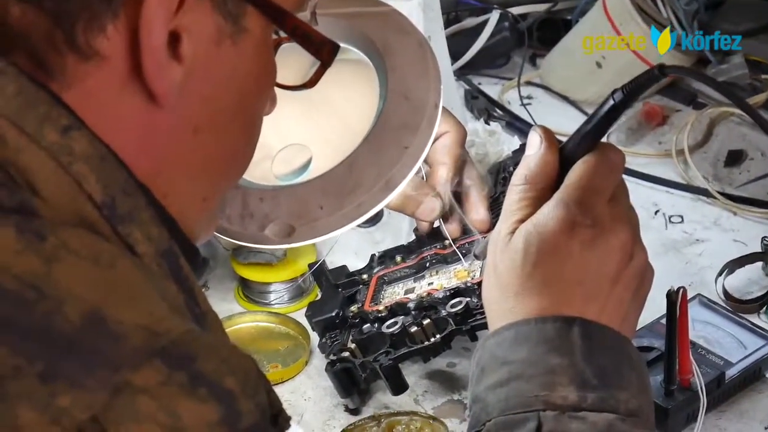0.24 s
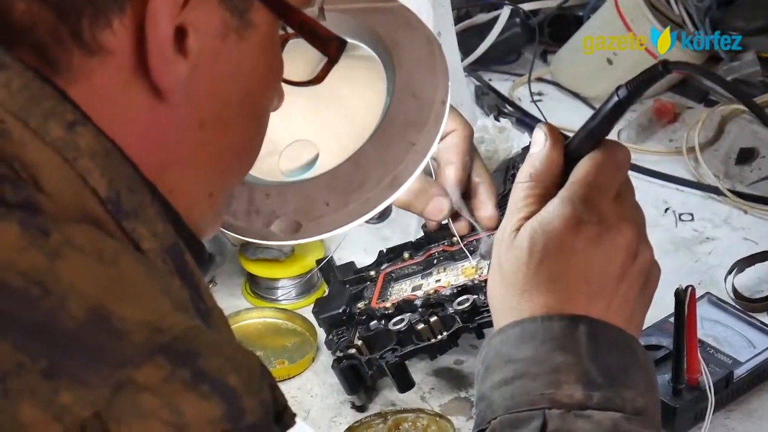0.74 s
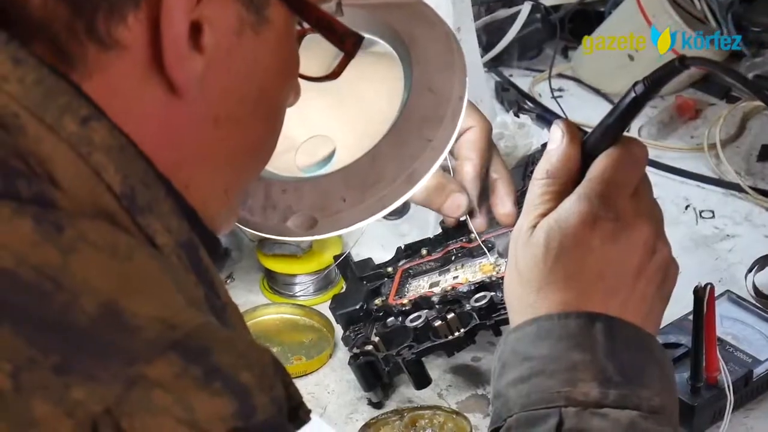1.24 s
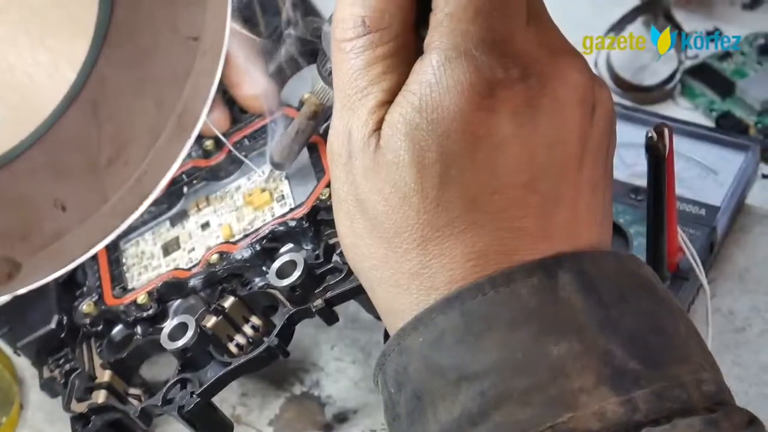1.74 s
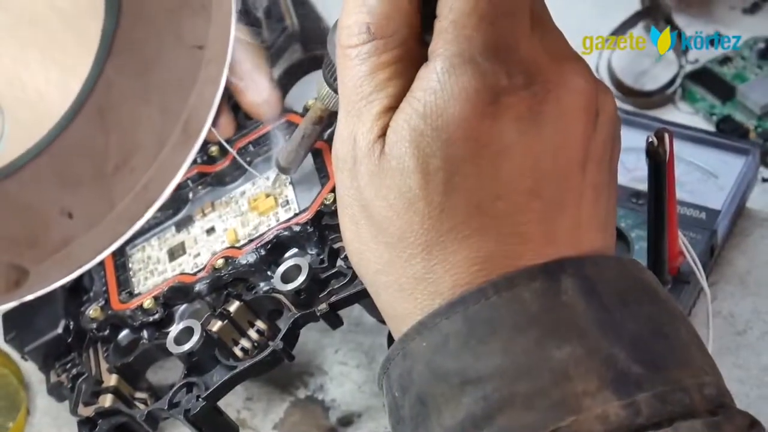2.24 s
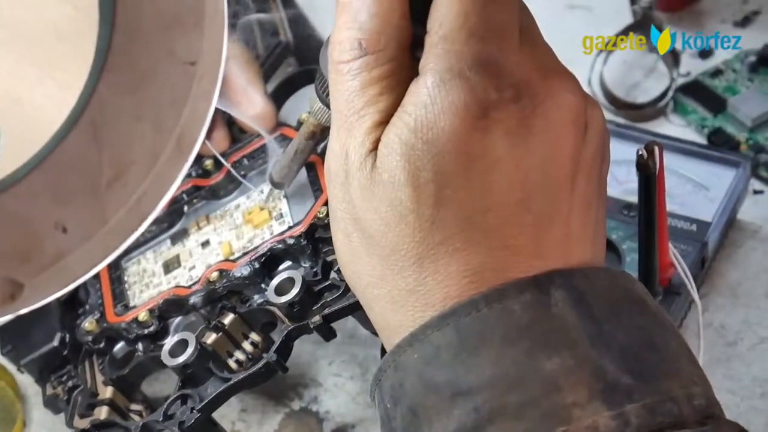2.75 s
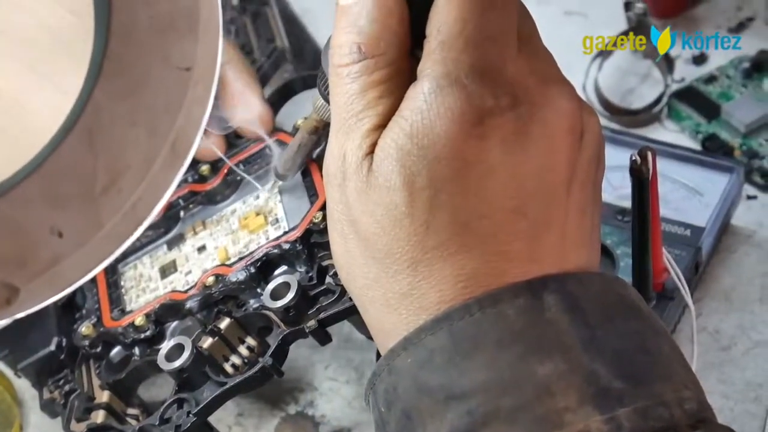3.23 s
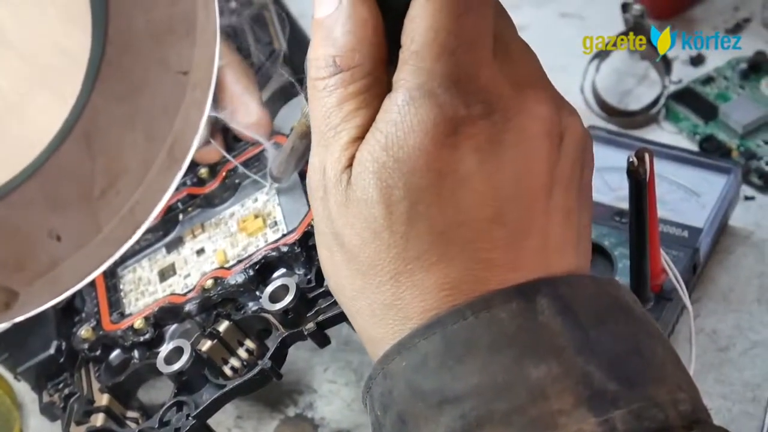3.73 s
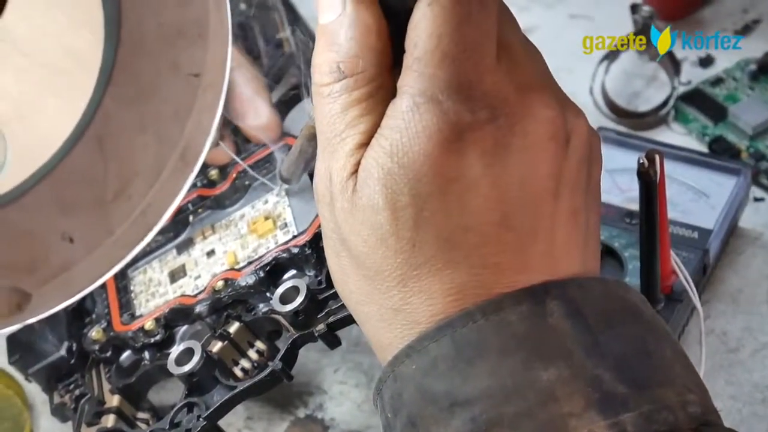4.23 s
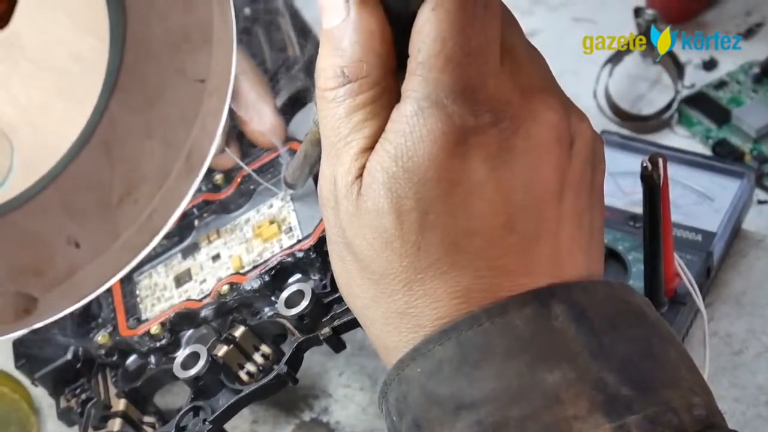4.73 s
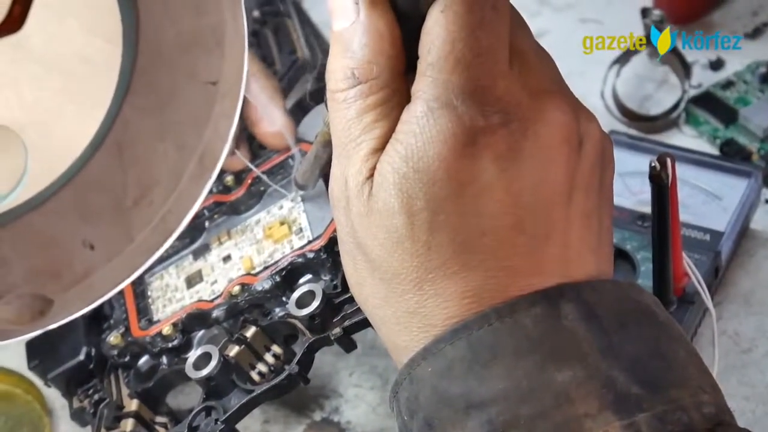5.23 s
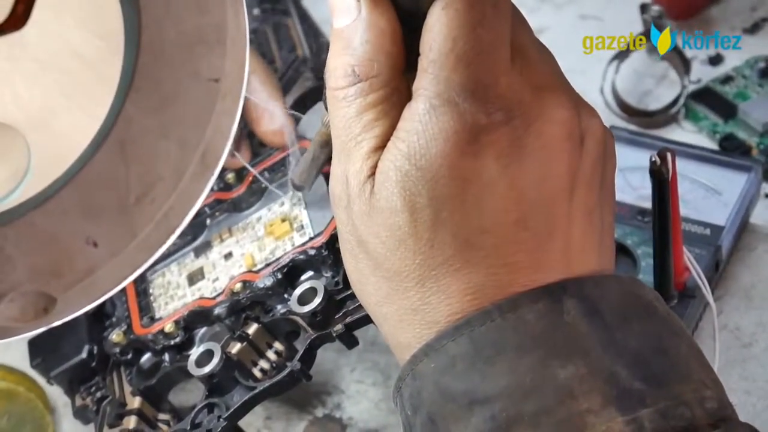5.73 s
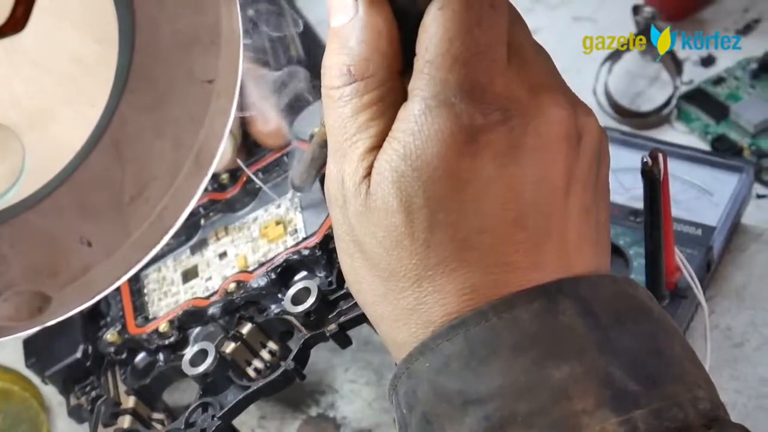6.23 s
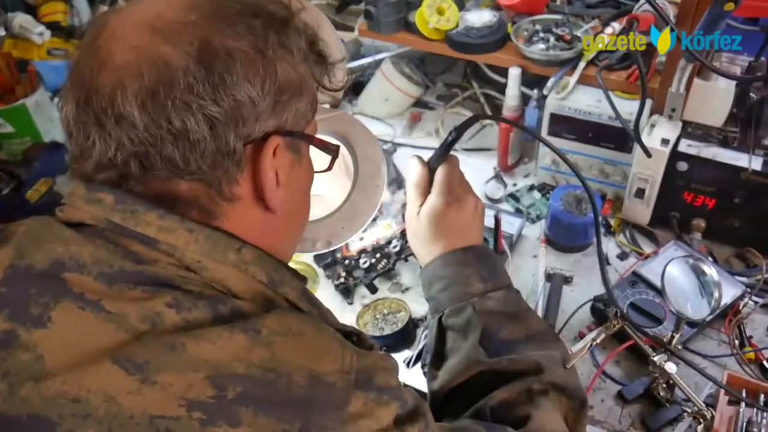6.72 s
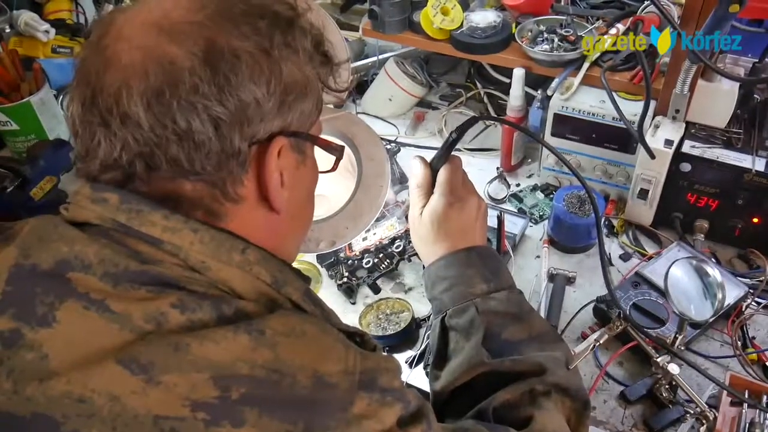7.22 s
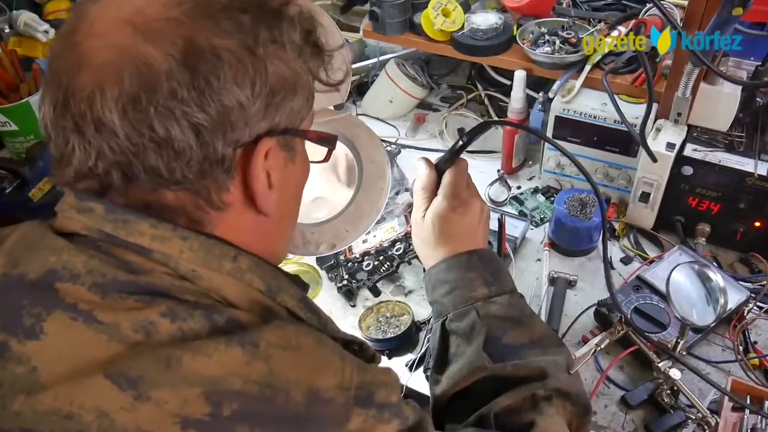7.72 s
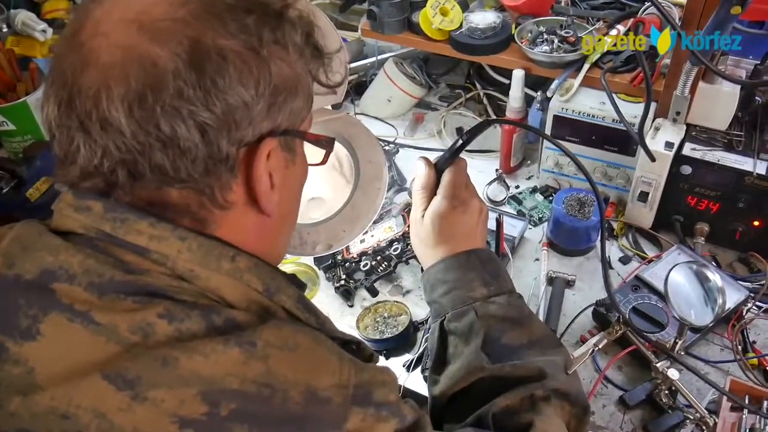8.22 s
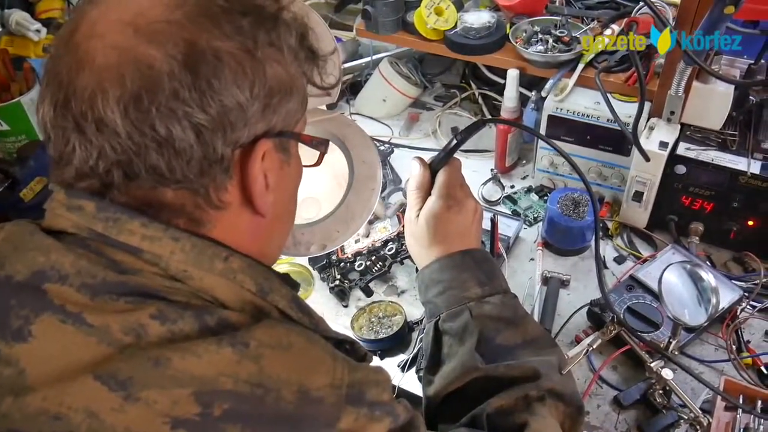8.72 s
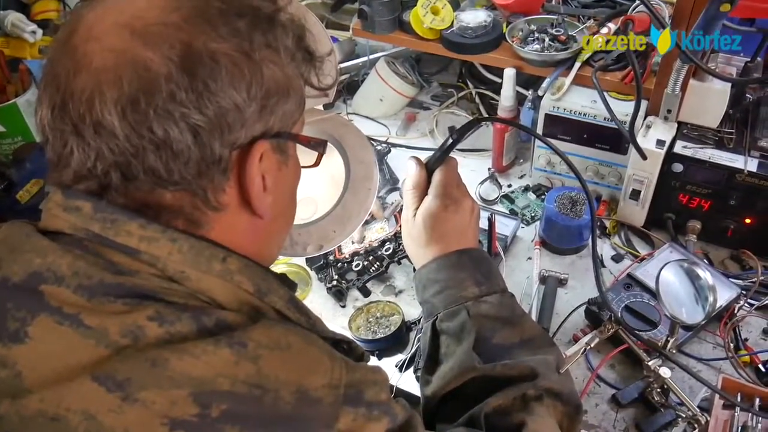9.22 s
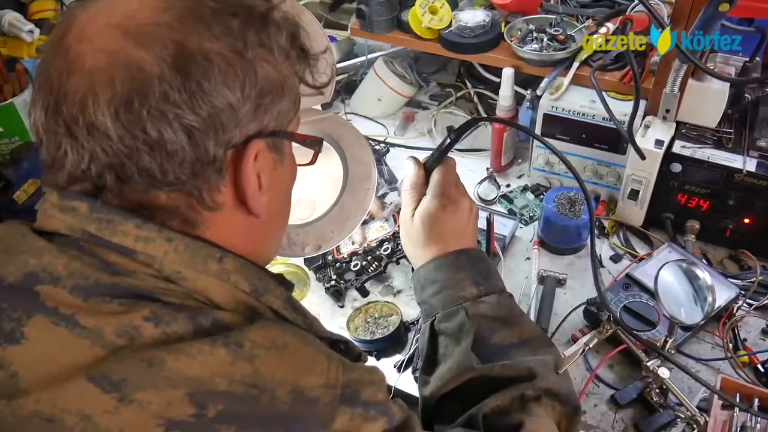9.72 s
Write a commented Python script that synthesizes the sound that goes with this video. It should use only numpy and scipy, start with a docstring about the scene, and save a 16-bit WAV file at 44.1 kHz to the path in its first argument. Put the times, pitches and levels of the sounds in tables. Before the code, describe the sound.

A low pump hum drones on a repair bench with small tool clicks and sizzling flux, cut twice by silence, ending in a broad airy rush.

```python
"""Repair bench, heard from three places in turn with a short silence between them.
A small air pump hums as stroke harmonics over coloured room noise; a far engine climbs as two sine orders.
At the last place a broad rush of turbulent noise, with whistles and a thrum, swells over the hum.
Tools tap as noise contacts ringing damped modes; flux spits under the iron as decaying noise puffs."""
import sys
import numpy as np
from scipy import signal
from scipy.fft import rfft, irfft, next_fast_len
from scipy.io import wavfile

SR = 44100
rng = np.random.default_rng(int(sys.argv[2]) if len(sys.argv) > 2 else 0)


def master_out(mix):
    """Clip the mix to full scale and print it as 16-bit PCM to the path in sys.argv[1]."""
    frames = np.transpose(np.atleast_2d(mix))
    ceiling = np.clip(frames, -1, 1)
    pcm = np.round(ceiling * 32767).astype(np.int16)
    wavfile.write(sys.argv[1], SR, pcm)


def decibels_to_gain(level_db):
    """Convert a level in decibels to a linear amplitude gain (20 dB per decade)."""
    exponent = np.asarray(level_db, float) / 20
    return 10 ** exponent


N = 439236


def rms_one(x):
    """Scales a signal to unit rms."""
    return x / np.sqrt(np.mean(x ** 2) + 1e-20)


def in_time(rows, outside=None):
    """Interpolates each column over time; first column is time_s."""
    time_s, *columns = np.transpose(rows)
    t = np.arange(N) / SR
    return [np.interp(t, time_s, column, outside, outside) for column in columns]


def at_hz(points, hz, column=1):
    """Interpolates a column over log frequency."""
    points = np.array(points)
    return np.interp(np.log(hz + 1), np.log(points[:, 0]), points[:, column])


def drift(rate_hz):
    """Slow Gaussian wander of spread 1: noise through a double pole at a 40 times lower rate."""
    step = 40
    r = np.exp(-2 * np.pi * step * rate_hz / SR)
    noise = rng.standard_normal(N // step + 2002)
    slow = signal.lfilter([1], [1, -2 * r, r * r], noise)[2000:]
    return np.interp(np.arange(N) / step, np.arange(len(slow)), rms_one(slow))


def coloured(x, spectrum):
    """Multiplies the signal's spectrum by a table of hz, gain_db."""
    size = next_fast_len(N)
    gain = decibels_to_gain(at_hz(spectrum, np.fft.rfftfreq(size, 1 / SR)))
    return irfft(rfft(x, size) * gain, size)[..., :N]


def resonance(x, hz, width_hz):
    """Two-pole resonator."""
    r = np.exp(-np.pi * width_hz / SR)
    feedback = [1, -2 * r * np.cos(2 * np.pi * hz / SR), r * r]
    return signal.lfilter([(1 - r * r) / 2, 0, (r * r - 1) / 2], feedback, x)


def narrow_noise(hz, width_hz, shape=N):
    """Noise of unit rms through two equal resonators."""
    once = resonance(rng.standard_normal(shape), hz, width_hz)
    return rms_one(resonance(once, hz, width_hz))


def spell_gain(start_s, length_s, level_db, rise_db_per_s, fall_db_per_s):
    """Gain that rises, holds its level and dies away, linear in dB."""
    t = np.arange(N) / SR
    rise_db = rise_db_per_s * (start_s - t)
    fall_db = fall_db_per_s * (t - start_s - length_s)
    return decibels_to_gain(level_db - np.maximum(0, np.maximum(rise_db, fall_db)))


# listening places: start_s, end_s, fade_out_s, pump_smear_rad
PLACES = [(0, 1.542, .014, -.18), (1.821, 6.544, .012, .08), (6.805, 9.97, .001, -.08)]


def place_index():
    """Number of the current place; switches inside the silences."""
    switches_s = [end + .05 for start, end, fade, smear in PLACES]
    return np.searchsorted(switches_s, np.arange(N) / SR).clip(max=len(PLACES) - 1)


def place_gate():
    """Gain 1 while a place is open, 0 in the silences."""
    t = np.arange(N) / SR
    gate = np.zeros(N)
    for start, end, fade, smear in PLACES:
        opening = np.clip((t - start) / 0.00026, 0, 1) ** 2
        gate += opening * np.clip((end - t) / fade, 0, 1)
    return gate


# left-right correlation: hz, room, rush
LIKENESS = [(60, 0.58, 0.23), (150, 0.68, 0.85), (380, 0.2, 0.89), (950, 0.076, 0.3), (2400, 0.25, 0.52),
            (6000, 0.72, 0.9), (15000, .6, 0.58)]


def air(spectrum, levels_db, likeness_column, patchy_db):
    """Stereo noise in octave patches that flicker; the parts below and above 1.5 kHz each follow a level."""
    size = next_fast_len(N)
    hz = np.fft.rfftfreq(size, 1 / SR)
    alike = np.clip(at_hz(LIKENESS, hz, column=likeness_column), 0, 1)
    mid, side = rfft(rng.standard_normal((2, size)))
    stereo = np.sqrt(1 + alike) * mid + np.sqrt(1 - alike) * side * [[1], [-1]]
    stereo = decibels_to_gain(at_hz(spectrum, hz)) * stereo
    octave = np.clip(np.log2(hz / 1500 + 1e-9), -5.5, 3.5)
    together = drift(3.0)
    parts = [0, 0]
    for k in range(-6, 4):
        share = np.cos(np.pi / 2 * np.clip(octave - k - .5, -1, 1)) ** 2
        flicker = decibels_to_gain(patchy_db * (0.58 * together + drift(20.0)))
        parts[k >= 0] = parts[k >= 0] + irfft(stereo * share, size)[:, :N] * flicker
    return sum(decibels_to_gain(level) * rms_one(part) for level, part in zip(levels_db, parts))


# room noise colour: hz, relative_db_per_hz
ROOM_COLOUR = [(15, -54.5), (25, -20.5), (130, -8), (180, -6), (229, -8), (591, -11.5), (818, -9.5),
               (936, -18.5), (1070, -16.5), (1520, -21.5), (2840, -20.5), (3920, -31), (9840, -36),
               (14400, -39), (16000, -37)]
# room noise level, one row per place: below_1500hz_db, above_1500hz_db
ROOM_LEVEL = [(-49.5, -63), (-50, -63), (-53, -65)]


def room():
    """Coloured noise floor, plus a narrow band of hiss."""
    levels_db = np.array(ROOM_LEVEL)[place_index()].T
    floor = air(ROOM_COLOUR, levels_db, likeness_column=1, patchy_db=-0.5)
    hiss = narrow_noise(2863, 250, (2, N))
    hiss_db = levels_db[1] - 12 + 1.9 * drift(5.7)
    return floor + decibels_to_gain(hiss_db) * hiss


# far engine: time_s, first_order_hz, first_order_db, second_order_db
ENGINE = [(1.82, 53.9, -69.5, -63.5), (2.2, 60, -61.5, -61.5), (2.6, 65.5, -70, -52),
          (2.75, 65.3, -57, -65.5), (2.95, 68.6, -53.5, -57), (3.5, 74.8, -52, -79),
          (3.72, 73.2, -57.5, -73.5), (3.85, 73.3, -73, -74)]


def engine():
    """Two low orders, phase-locked, following the speed."""
    hz = in_time(ENGINE)[0]
    first_db, second_db = in_time(ENGINE, outside=-140)[1:]
    turn = 2 * np.pi * np.cumsum(hz) / SR
    return np.sqrt(2) * (decibels_to_gain(first_db) * np.sin(turn) + decibels_to_gain(second_db) * np.sin(2 * turn))


def causal_phase(levels_db):
    """Minimum phase: the most compact pulse with these harmonic levels, by folding the cepstrum."""
    padded_db = np.r_[levels_db[0], levels_db, [levels_db[-1] - 10] * 4]
    shape = np.log(decibels_to_gain(padded_db))
    folded = irfft(shape)
    folded[1:len(shape) - 1] *= 2
    folded[len(shape):] = 0
    return rfft(folded).imag[1:len(levels_db) + 1]


# pump harmonics shaped by the room: multiple, then left_db, right_db for each place
PUMP = [(1, -77, -79, -69, -71, -80, -82), (2, -64, -61, -64, -61, -61, -60),
        (3, -82, -82, -71, -68, -82, -82), (4, -53, -53, -52, -52, -54, -54),
        (5, -65, -61, -58, -60, -82, -82), (6, -64, -65, -56, -57, -53, -54),
        (7, -63, -64, -60, -59, -58, -59), (8, -56, -55, -58, -59, -53, -56),
        (9, -68, -60, -59, -58, -82, -62), (10, -61, -58, -61, -62, -82, -60),
        (11, -59, -55, -67, -59, -65, -60), (12, -50, -55, -78, -58, -53, -60),
        (13, -63, -62, -56, -62, -53, -57), (14, -68, -65, -59, -60, -54, -52),
        (15, -67, -67, -71, -66, -57, -56), (16, -56, -68, -56, -58, -55, -61),
        (17, -63, -58, -52, -55, -56, -54), (18, -52, -70, -50, -53, -48, -58),
        (19, -58, -62, -82, -82, -69, -68), (20, -73, -71, -79, -82, -82, -68),
        (21, -76, -74, -71, -82, -82, -67), (22, -73, -74, -70, -77, -82, -68),
        (23, -62, -75, -59, -59, -61, -68), (24, -61, -71, -59, -73, -64, -82),
        (25, -60, -64, -63, -77, -81, -70), (26, -65, -68, -69, -82, -64, -82),
        (27, -66, -70, -65, -65, -62, -68), (28, -75, -64, -69, -65, -62, -65),
        (29, -69, -72, -77, -79, -78, -80), (30, -75, -78, -82, -82, -82, -82),
        (31, -69, -72, -82, -82, -82, -82)]


def pump():
    """Stroke harmonics; push and pull differ, the room smears the pulse, the right side hears it late."""
    stroke_hz = 45.83 * (1 + 1e-4 * drift(0.24))
    stroke = np.exp(2j * np.pi * np.cumsum(stroke_hz) / SR)
    table = np.array(PUMP)
    k = table[:, 0]
    right = np.array([[0], [1]])
    weights = []
    for n, (start, end, fade, smear_rad) in enumerate(PLACES):
        level_db = table[:, 1 + 2 * n:3 + 2 * n].T
        phase = np.array([causal_phase(db) for db in level_db])
        phase = phase + smear_rad * k * k
        phase = phase + 2.4 * (k % 2)     # odd harmonics: push against pull
        phase = phase - .03 * right * k   # delay on the right
        weights.append(np.sqrt(2) * decibels_to_gain(level_db) * np.exp(1j * phase))
    place = place_index()
    out = np.zeros((2, N))
    harmonic = np.ones(N)
    for weight in np.transpose(weights):
        harmonic = harmonic * stroke
        waver = 1 + 0.13 * drift(1.9)
        out += (weight[:, place] * harmonic).real * waver
    return out


# rush colour: hz, relative_db_per_hz
RUSH_COLOUR = [(35, -53), (60, -15.5), (79, -15.5), (193, 1), (389, -5), (437, 0), (492, -6), (698, -4),
               (1110, -12.5), (1250, -12), (3500, -15), (4030, -21.5), (6900, -23.5), (10500, -35.5),
               (16000, -63)]
# rush level: time_s, below_1500hz_db, above_1500hz_db
RUSH_LEVEL = [(6.81, -39, -43), (6.9, -40.5, -43.5), (7.15, -48.5, -55), (7.25, -44.5, -57),
              (7.36, -39, -47), (7.76, -39, -43), (9.96, -41.5, -44)]
# faint steady whistles: hz, resonator_width_hz, db_re_upper_rush
WHISTLES = [(2950, 37, -23), (3430, 54, -14.5)]
# swells of the lowest whistle: start_s, length_s, level_db
SWELLS = [(8.63, .25, -48), (9.78, .13, -51.5)]
# low thrum: time_s, level_db
THRUM = [(6.806, -49), (7.716, -49.5), (8.2, -56)]


def rush():
    """Broad turbulent air, with whistles and a thrum as resonated noise."""
    low_db, high_db = in_time(RUSH_LEVEL, outside=-140)
    out = air(RUSH_COLOUR, (low_db, high_db), likeness_column=2, patchy_db=0.65)
    for hz, width_hz, relative_db in WHISTLES:
        whistle_db = relative_db + high_db + 2.5 * drift(6.9)
        out = out + decibels_to_gain(whistle_db) * narrow_noise(hz, width_hz)
    swell = sum(spell_gain(*row, rise_db_per_s=104, fall_db_per_s=98) for row in SWELLS)
    out = out + swell * decibels_to_gain(2.0 * drift(8.0)) * narrow_noise(1904, 240)
    thrum_db = in_time(THRUM, outside=-140)[0]
    return out + decibels_to_gain(thrum_db) * narrow_noise(150, 64.0)


# tool taps: start_s, peak_db, contact_ms, softness_cut_hz, body_below_2khz_db
TAPS = [(0.459, -31.5, 21, 8000, 4), (.839, -52, 7.2, 4000, -2), (.96, -50, 38, 3500, 0),
        (1.02, -51.5, 25, 3540, -4), (1.251, -24, 2.5, 14230, -8), (1.291, -37.5, 24, 2830, 2.5),
        (1.43, -44, 36, 2790, 3), (1.47, -49, 25, 4000, -6.5), (1.524, -34, 11, 2920, 1),
        (3.664, -39.5, 4.4, 5000, 13), (5.115, -54, 10, 8000, -12), (5.2346, -32, .3, 3600, -6),
        (5.264, -32, 0.29, 3330, -6), (5.404, -41, .3, 4000, -0.5), (6.3821, -14, .3, 9000, -11.5)]
# ringing modes of a tap: hz, level_db, t60_s
TAP_MODES = [(1180, -11, 0.022), (1610, -6, 0.0087), (2250, -1, 0.0051), (2574, -0.5, .009),
             (3080, -5.5, 0.01), (3600, -3, 0.012), (4250, -4.5, 0.0097), (4680, -7, .007),
             (5400, -4.5, 0.0059), (6980, -7.5, 0.002), (9500, -2.5, 0.0015), (13000, -13.5, 0.0019)]


def taps():
    """A rough contact drives every damped mode; the walls answer with a short tail."""
    out = np.zeros(N)
    for start_s, peak_db, contact_ms, cut_hz, body_db in TAPS:
        length = int(np.clip(contact_ms * SR / 1000, 8, 1500))
        envelope = np.sin(np.pi * (np.arange(length) / length) ** 0.55)
        push = np.zeros(3000)
        push[:length] = .5 * rng.standard_normal(length) * envelope
        push[4] += 3.0   # first touch: a clean tick
        push = signal.lfilter(*signal.butter(4, cut_hz, fs=SR), push)   # softer is duller
        sound = 0
        for k, (hz, level_db, t60_s) in enumerate(TAP_MODES):
            r, w = decibels_to_gain(-60 / (t60_s * SR)), 2 * np.pi * hz / SR
            ring = signal.lfilter([0, np.sin(w)], [1, -2 * r * np.cos(w), r * r], push)
            sound = sound + (-1) ** k * decibels_to_gain(level_db + body_db * (hz < 2000)) * ring
        first = int(start_s * SR)
        out[first:first + 3000] += decibels_to_gain(peak_db) * sound / np.abs(sound).max()
    t = np.arange(4000) / SR
    walls = rng.standard_normal((2, 4000)) * decibels_to_gain(-60 * t / 0.045) * (t > .003)
    tail = signal.fftconvolve(out[None], walls, axes=1)[:, :N]
    return out * decibels_to_gain([[-1.0], [1.0]]) + decibels_to_gain(-33.0) * tail


def bursts(clicks, t60_s):
    """Each click opens a puff of stereo noise that dies away exponentially."""
    envelope = signal.lfilter([1], [1, -decibels_to_gain(-60 / (t60_s * SR))], clicks + 1e-18)
    return envelope * rng.standard_normal((2, N))


# flux colour: hz, relative_db_per_hz
SIZZLE_COLOUR = [(880, -42), (1500, -22.5), (2160, -16.5), (2490, -11.5), (3960, -17.5), (4920, -9.5),
                 (5330, -10), (6240, -12.5), (6830, -9), (8000, -17), (10200, -5), (11300, -13.5),
                 (13100, -12.5), (14900, -30.5), (16000, -28.5)]


def fizz():
    """Dense tiny bursts of steam in clumps, over steady noise, at unit rms."""
    sizes = decibels_to_gain(5.0 * np.minimum(rng.exponential(1, N), 3))
    median_per_s = 160
    born = rng.random(N) < median_per_s * decibels_to_gain(4.0 * drift(20.0)) / SR
    steam = bursts(sizes * born, t60_s=0.0095) + rng.standard_normal((2, N))
    return rms_one(coloured(steam, SIZZLE_COLOUR))


# single spits, before colouring: start_s, drive_db, tilt_to_low_treble_db
SPITS = [(0.086, -46, 5), (0.1321, -40, 2), (0.187, -45, 5), (1.003, -42, 0.5), (1.047, -39, -2.5),
         (1.369, -46.5, 8), (1.4067, -41, 12), (1.9306, -29, 1), (1.94, -25, -4.5), (2.0255, -18, 1.5),
         (2.1216, -46, -4), (2.312, -45, -3), (2.4568, -27, -1), (2.4929, -29, -4), (2.552, -24.5, -1),
         (2.5628, -33.5, 2), (2.583, -27.5, -9.5), (2.627, -28.5, 4), (2.649, -26, 4), (2.744, -25.5, -4.5),
         (2.836, -27, 1), (2.875, -24, -0.5), (2.9603, -28.5, -6.5), (3.1183, -34.5, -2.5),
         (3.7848, -41, 3), (3.9144, -43, 5), (4.3832, -47.5, 12.5), (7.6353, -35.5, 14)]
# the iron makes the flux boil, before the band split: start_s, length_s, drive_db, tilt_to_low_treble_db
BOILS = [(0.072, 0.11, -66, 9), (1.003, 0.17, -81, -7), (1.4, 0.066, -69.5, 9), (1.805, 0.021, -55.5, -4),
         (1.918, 0.18, -62.5, 4.5), (2.453, 0.078, -58, -2), (2.68, .3, -54.5, -0.5),
         (6.147, 0.029, -74, 4.5)]


def flux():
    """Boiling fizz and louder single spits, each in a lower and an upper treble band."""
    boiling = fizz()
    spit_s, drive_db, tilt_db = np.transpose(SPITS)
    out = 0
    for sign, edges_hz in ((1, [1800, 8000]), (-1, [8000, 16000])):
        clicks = np.zeros(N)
        clicks[(spit_s * SR).astype(int)] = decibels_to_gain(drive_db + sign * tilt_db)
        puff = bursts(clicks, t60_s=0.005) + decibels_to_gain(-6.5) * bursts(clicks, t60_s=0.086)
        puff = coloured(puff, SIZZLE_COLOUR)
        boil = sum(spell_gain(start_s, length_s, db + sign * tilt, rise_db_per_s=398, fall_db_per_s=133)
                   for start_s, length_s, db, tilt in BOILS)
        band = signal.butter(2, edges_hz, "band", fs=SR, output="sos")
        out = out + sign * signal.sosfilt(band, puff + boil * boiling)
    centre, spread = out
    return centre * decibels_to_gain([[-.6], [.6]]) + .3 * spread * [[1], [-1]]


def scene():
    """All sources, heard only while a place is open."""
    return place_gate() * (room() + engine() + pump() + rush() + taps() + flux())


def roll_off(x):
    """The treble ends steeply here."""
    return signal.sosfilt(signal.butter(12, 16410, fs=SR, output="sos"), x)


# microphone housing: hz, gain_db
MICROPHONE = [(1500, 0), (2200, -2), (2850, 1.5), (3600, 0.5), (4050, -1), (4700, 1.5), (5600, -2),
              (6700, 3), (7400, 1), (7900, -4.5), (8300, -1), (9000, -1.5), (9800, 1.5), (11500, -1),
              (15000, -1.5), (15700, -31.5)]


def record(dry):
    """The microphone housing colours the treble."""
    mix = coloured(dry, MICROPHONE)
    return roll_off(mix)


dry = scene()
out = record(dry)
master_out(out)
```